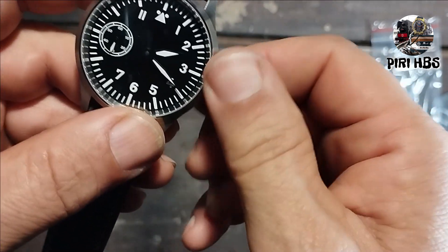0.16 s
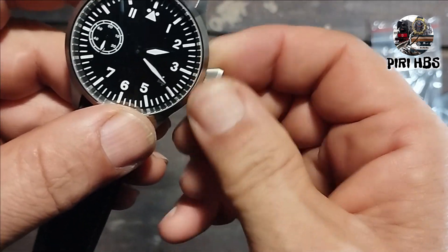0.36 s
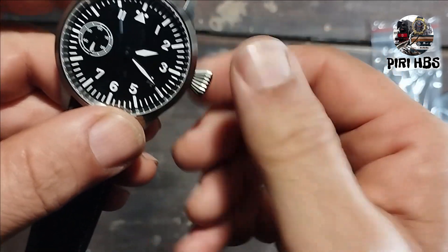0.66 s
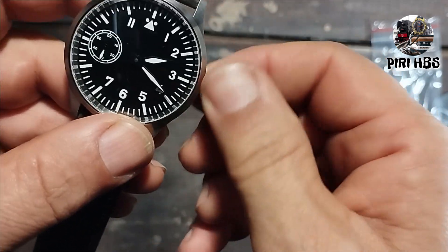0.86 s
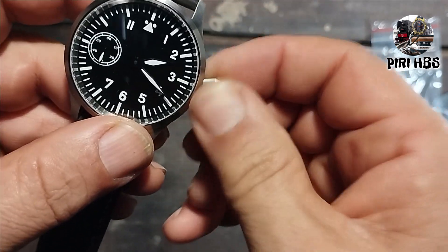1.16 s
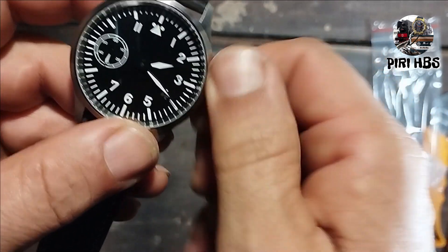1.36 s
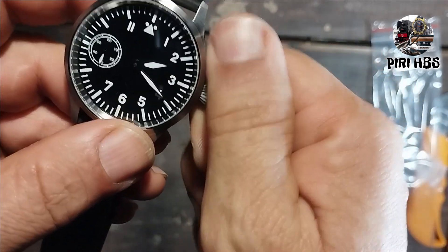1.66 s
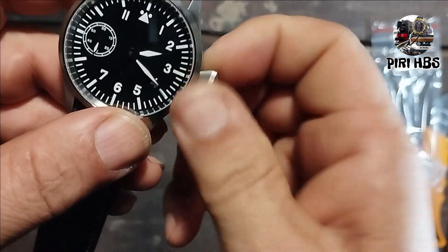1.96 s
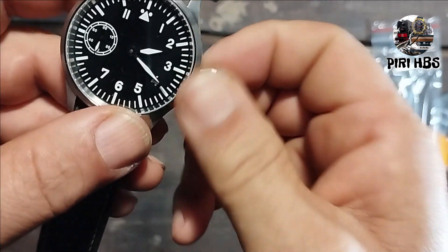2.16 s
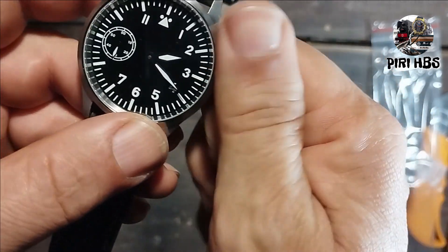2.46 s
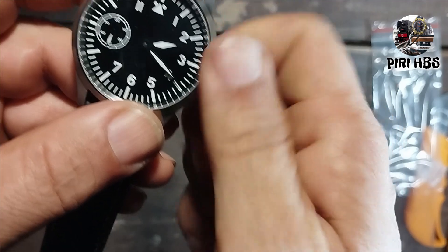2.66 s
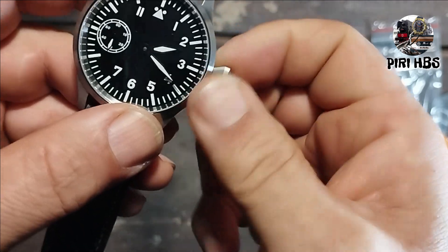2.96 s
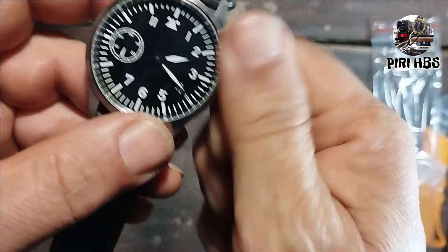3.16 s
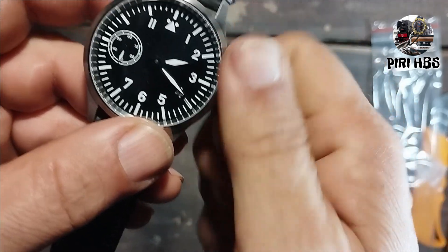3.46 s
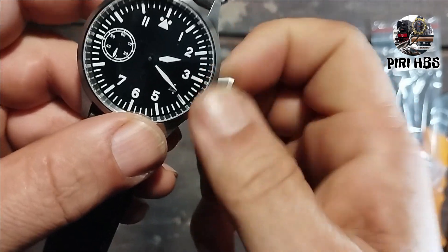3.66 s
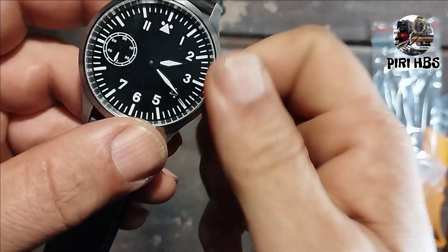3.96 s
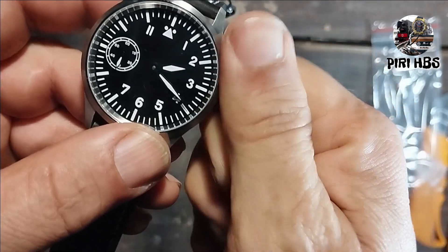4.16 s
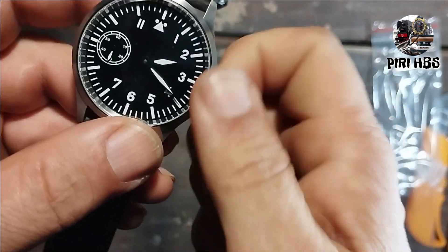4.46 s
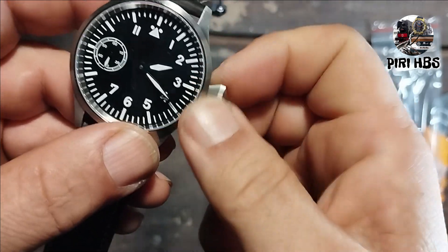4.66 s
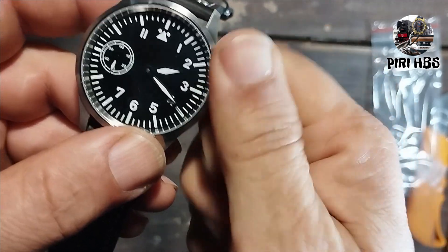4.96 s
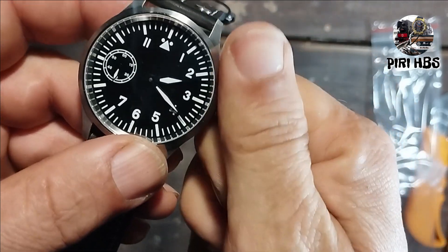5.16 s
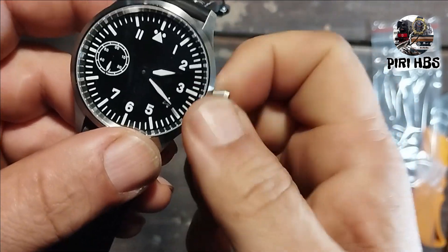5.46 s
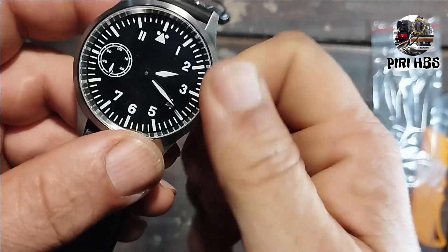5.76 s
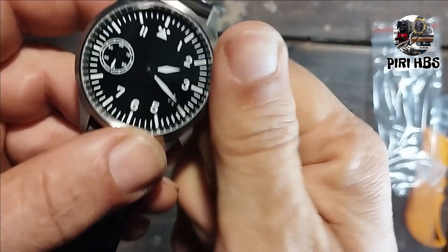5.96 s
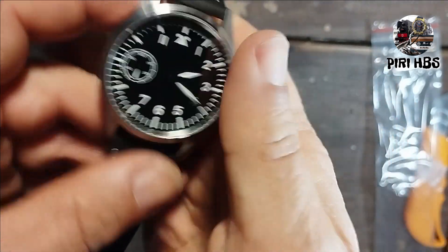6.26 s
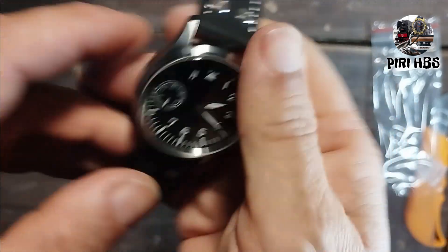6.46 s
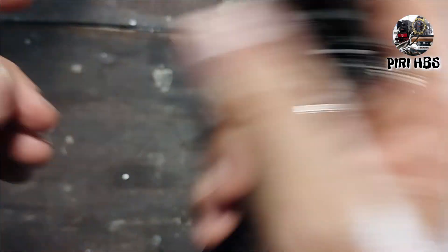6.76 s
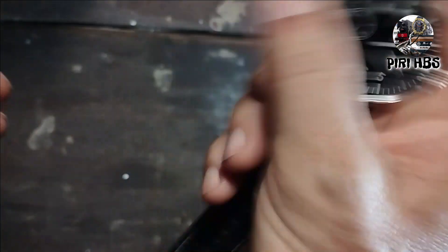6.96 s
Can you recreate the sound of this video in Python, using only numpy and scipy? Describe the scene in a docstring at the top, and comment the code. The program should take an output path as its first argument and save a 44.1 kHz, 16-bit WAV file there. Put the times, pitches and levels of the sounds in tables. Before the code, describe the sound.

Fingers wind a steel wristwatch close to the microphone in a quiet room. A few light ticks come first, then six short strokes of the crown, each a quick run of crisp, slightly ringing ratchet clicks. Softer, drier ticks follow as the crown turns back between strokes. The winding stops near the end, leaving very faint rubbing of skin and strap. A low handling rumble, a distant engine drone and slight hiss lie underneath.

```python
"""A wristwatch is wound by hand, close to a phone. In six forward strokes of the crown (the winding knob),
a small catch snaps over the teeth of a wheel and makes the steel case ring. On each turn back, the
clutch teeth slip over each other with lighter ticks. Fingers rub over the crown, case and strap.
Underneath are the drone of a far engine, a low handling rumble, room noise and hiss."""
import sys
import numpy as np
from scipy import signal
from scipy.fft import rfft, irfft, next_fast_len
from scipy.io import wavfile
from scipy.ndimage import uniform_filter1d

SR = 44100
rng = np.random.default_rng(int(sys.argv[2]) if len(sys.argv) > 2 else 0)


def store_pcm(level_fs):
    """Save levels as 16-bit WAV."""
    pcm = np.round(np.clip(level_fs, -1, 1) * 32767).astype(np.int16)
    wavfile.write(sys.argv[1], SR, np.atleast_2d(pcm).T)


N = 314025
TIME = np.arange(N) / SR

# Forward strokes of the crown; the grip lets different parts ring each time. Each row: start in seconds,
# length in seconds, then how strongly the case, back plate and wheel ring, in dB.
CROWN_STROKES = [(1.30, 0.39, -16.5, -20, -8.5), (2.28, .29, -15.5, -21, -7),
                 (3.099, 0.31, -15.5, -18.5, -8.5), (3.98, .35, -16.5, -14, -12),
                 (4.886, .34, -16.5, -14, -10.5), (5.768, .34, -16.5, -14, -13)]
# Clutch teeth slipping. Each row: time in seconds, level in dB, treble in dB relative to that level.
CLUTCH_SLIPS = [(0.243, -49, -17), (0.2932, -53.5, -9), (0.3382, -51, -11), (0.3781, -47, -19),
                (0.4396, -49.5, -11), (0.4767, -49, -13), (0.5253, -47.5, -19), (0.9201, -51.5, -19),
                (0.9682, -53.5, -14), (0.995, -49.5, -19), (1.018, -49.5, -14), (1.064, -48, -12.5),
                (1.2535, -46, -18), (1.8495, -48, -23), (1.8735, -52, -16), (1.8988, -42.5, -24),
                (1.925, -52, -15), (1.9495, -52.5, -12), (1.9804, -49.5, -14), (2.0211, -49.5, -14),
                (2.048, -48, -16), (2.0692, -47.5, -17), (2.0993, -49.5, -14), (2.2296, -50, -26),
                (2.6724, -47, -23), (2.6933, -53, -15), (2.7196, -49, -19), (2.7422, -51, -18),
                (2.7591, -53, -13), (2.7731, -49, -13), (2.7915, -52, -14), (2.8583, -50, -17),
                (2.888, -51, -16), (2.918, -53, -14), (3.5227, -50.5, -21), (3.5324, -51.5, -18),
                (3.5556, -51, -13), (3.5766, -52, -15), (3.5972, -52, -17), (3.6204, -53, -13),
                (3.6411, -53, -17), (3.6606, -52, -15), (3.6865, -51.5, -15), (3.7283, -50, -17),
                (3.7605, -48.5, -17), (3.7834, -53, -18), (3.921, -55, -17), (4.4046, -51, -20),
                (4.426, -56, -15), (4.4458, -54, -15), (4.4667, -50, -17), (4.4874, -52, -14),
                (4.5089, -48.5, -19), (4.5344, -51.5, -14), (4.566, -52, -14), (4.597, -49.5, -16),
                (4.6239, -49, -16), (4.6536, -52, -16), (4.812, -52.5, -21), (5.3353, -54, -21),
                (5.3466, -50.5, -19), (5.3663, -57, -14), (5.3827, -50, -17), (5.3996, -51, -16),
                (5.4151, -48.5, -20), (5.4331, -55, -18), (5.458, -51, -18), (5.5059, -53, -14),
                (5.539, -50.5, -14), (5.5932, -49.5, -16), (5.7129, -52.5, -23)]


def winding():
    """A spring-loaded catch drops off each tooth of the wheel, making a crack and ringing the watch."""
    # Each row is one tooth: time in seconds, level in dB, treble in dB relative to that level.
    teeth = [(1.311, -40.5, -17), (1.342, -37.5, -19), (1.383, -42, -19), (1.4185, -40, -21),
             (1.4435, -39.5, -18), (1.4687, -40.5, -17), (1.501, -40, -19), (1.5513, -37.5, -18),
             (1.5855, -37, -15), (1.6318, -41.5, -14), (2.2758, -38, -19), (2.2942, -40, -15),
             (2.3221, -40.5, -9), (2.349, -38.5, -12), (2.369, -39.5, -18), (2.387, -39, -19),
             (2.4043, -40, -21), (2.4256, -37.5, -14), (2.4524, -40.5, -21), (2.4833, -41, -18),
             (2.5121, -40.5, -17), (2.5471, -42, -16), (3.1137, -39, -17), (3.1272, -41, -17),
             (3.1428, -39, -20), (3.1593, -40, -11), (3.173, -40, -21), (3.1906, -39.5, -21),
             (3.219, -41.5, -15), (3.2503, -40, -22), (3.269, -38.5, -18), (3.2844, -38, -18),
             (3.3027, -39, -18), (3.3428, -39.5, -11), (3.3962, -37.5, -18), (3.9906, -40.5, -14.5),
             (4.0082, -41, -13), (4.0248, -40, -18), (4.0451, -39, -20), (4.0698, -40, -20),
             (4.0914, -38.5, -20), (4.1135, -39, -18), (4.1389, -37, -20), (4.1614, -38, -19),
             (4.1839, -37.5, -24), (4.209, -38.5, -19), (4.2475, -38.5, -17), (4.3223, -39.5, -9),
             (4.8979, -41.5, -11.5), (4.9182, -43.5, -12), (4.9356, -39, -18), (4.9515, -43, -16),
             (4.9703, -40.5, -19), (4.9928, -39, -22), (5.0207, -38, -23), (5.0433, -39, -22),
             (5.0649, -39, -21), (5.0863, -39, -18), (5.123, -38, -17), (5.1612, -40.5, -17),
             (5.2182, -41, -9.5), (5.7784, -38, -18), (5.7928, -40, -13), (5.8117, -40.5, -13),
             (5.8406, -40.5, -19), (5.879, -39.5, -18), (5.9075, -39.5, -18), (5.9281, -39.5, -14),
             (5.944, -37.5, -14), (5.9684, -37, -16), (6.0049, -39.5, -12), (6.1006, -42, -20)]
    # The tone of steel hitting steel. Each row: frequency in Hz, left level in dB, right level in dB.
    spectrum = [(500, -32.5, -29), (1400, -14, -18.5), (1970, -3.5, -6), (2600, 2, 1), (3300, -2, -0.5),
                (4160, -10, -8.5), (5250, -4.5, -4), (6160, 2.5, -5), (7600, -2, 2.5), (7800, 0, -1.5),
                (8840, 0, -4.5), (11200, -13, -23), (11540, -1, -8), (13000, -10.5, -9.5), (14800, 7, -3.5),
                (16800, -19, -16)]
    times, db, treble_db = np.transpose(teeth)
    strokes = np.array(CROWN_STROKES)
    middles = strokes[:, 0] + strokes[:, 1] / 2
    nearest = np.argmin(np.abs(times[:, None] - middles), axis=1)
    start, length, case_db, plate_db, wheel_db = strokes[nearest].T
    progress = np.clip((times - start) / length, 0, 1)
    # As the hand closes round the case, its ring gets brighter and the wheel is muffled.
    closed = np.clip((times - start) / 0.11, 0, 1)
    tilt_db = -19 + 33 * closed
    wheel_db = wheel_db - 9 * progress ** 2
    # A tooth that drops after a pause rings the back plate harder, fully so after 0.082 seconds.
    settled = np.minimum(np.diff(times, prepend=0) / 0.082, 1)
    plate_db = plate_db + 8.5 * (settled - .5)
    parts_db = [case_db, plate_db, wheel_db, treble_db - 0.5]
    rise = .05 * (progress - .35)  # the pitch of the case climbs 5% over a stroke
    snaps = tooth_crack(times, db - 3.5, treble_db + 16, spectrum,
                        strike=1.6, bounce_db=-4, bounce_s=0.0033)
    return snaps + watch_ring(times, db, parts_db, tilt_db, detune=0.007, scatter=0.18, case_rise=rise)


def slipping():
    """Turned back, the sloped clutch teeth ride over each other; the fingers cut the ringing short."""
    # The tone of one tick. Each row: frequency in Hz, left level in dB, right level in dB.
    spectrum = [(514, -27, -39), (2190, -12.5, -2.5), (3500, 1, -1), (4700, -5.5, -3.5), (6180, 1.5, 2.5),
                (7170, 2, -3), (7950, -5.5, 3.5), (9560, -3, -4.5), (11040, -16.5, -22), (11900, -12.5, -9),
                (12900, -4.5, -14), (15500, -4.5, -10), (16500, -15.5, -16)]
    times, db, treble_db = np.transpose(CLUTCH_SLIPS)
    ticks = tooth_crack(times, db - 1, treble_db + 18, spectrum, strike=2.2, bounce_db=0, bounce_s=0.0016)
    parts_db = [-30.5, -17, -17, treble_db - 1]  # case, back plate, wheel, treble
    return ticks + watch_ring(times, db, parts_db, tilt_db=19, detune=.01, scatter=0.43, longest_s=.06)


def tooth_crack(times, db, treble_db, spectrum, strike, bounce_db, bounce_s):
    """A tooth lands with a hard, gritty hit; the spring throws it back and it lands again, thinly."""
    size, split_hz, right_lag_s = 1024, 11000, 7 / SR
    grit = rng.standard_normal((len(times), 3, size))  # left, right and shared noise
    decay = fade(0.014, size)
    lowpass = signal.butter(4, split_hz, fs=SR, output="sos")
    highpass = signal.butter(4, split_hz, "high", fs=SR, output="sos")
    hz, *sides_db = np.transpose(spectrum)
    bounce_delay = bounce_s * rng.uniform(0.94, 1.0, len(times))
    out = []
    for side, side_db in enumerate(sides_db):
        burst = (grit[:, 2] + .5 * grit[:, side]) * decay
        burst[:, 8] += strike  # one sharp spike is the hit itself
        burst /= np.linalg.norm(burst, axis=1, keepdims=True) / np.linalg.norm(decay)
        arrival = times + side * right_lag_s
        dull = place(arrival, burst, db)
        bright = place(arrival, burst, db + treble_db)
        bright += place(arrival + bounce_delay, burst, db + treble_db + bounce_db)
        crack = signal.sosfilt(lowpass, dull) + signal.sosfilt(highpass, bright)
        out.append(colour(crack, hz, side_db))
    return np.array(out)


def watch_ring(times, db, parts_db, tilt_db, detune, scatter, case_rise=0, longest_s=.5):
    """Each hit rings the watch like a tiny bell, a little differently as the grip changes."""
    # The watch's own tones. Each row: pitch in Hz, seconds to fade by 60 dB, left level in dB,
    # right level in dB, how far the left wave runs ahead in radians.
    tones = [(2500, 0.015, -1.5, 1, 4), (2800, 0.034, 2.5, 4.5, 3.7), (3060, 0.034, -2, -2, 2.3),
             (3357, 0.033, -3, 1.5, -2.5), (5400, 0.028, -3.5, -7, -1.3), (5700, 0.028, 0, 0.5, -0.3),
             (5735, 0.17, -11, -11, 2.3), (6140, 0.017, 2.5, -8, -6.5), (6650, 0.016, 3.5, -9, -3),
             (8265, 0.01, 4, 4, 0.28), (8660, 0.012, -11, -1, 6.5), (12340, 0.03, 5, -13, -3),
             (12800, 0.014, -3, -6, -2), (14400, 0.0026, -2, -3, 1.5), (15200, 0.011, -4, -19, 5)]
    # The middle pitches in Hz of the case, back plate, wheel and treble rings.
    parts_hz = [3000, 5700, 8400, 12000]
    chance = rng.standard_normal((len(times), len(tones), 3))
    starts = times + .0002  # just after the hit
    out = np.zeros((2, N))
    for k, (hz, fade_s, left_db, right_db, lead) in enumerate(tones):
        part = np.argmin(np.abs(np.log(np.array(parts_hz) / hz)))
        is_case = part == 0
        octaves_up = np.log2(hz / parts_hz[0])
        level_db = db + parts_db[part] + tilt_db * octaves_up * is_case
        fade_s = min(fade_s, longest_s)
        size = int(fade_s * SR)
        pitch = hz * (1 + detune * chance[:, k, :1] + np.reshape(case_rise, (-1, 1)) * is_case)
        strength = 1 + scatter * (chance[:, k, 1:2] + 1j * chance[:, k, 2:])  # also shifts the phase
        tone = strength * np.exp(2j * np.pi * pitch * np.arange(size) / SR) * fade(fade_s, size)
        out[0] += place(starts, (tone * np.exp(1j * lead / 2)).imag, level_db + left_db)
        out[1] += place(starts, (tone * np.exp(-1j * lead / 2)).imag, level_db + right_db)
    # So small a body gives off almost no bass.
    return signal.sosfilt(signal.butter(2, 1900, "high", fs=SR, output="sos"), out)


def room_echo(sound, echo_db, fade_s, cutoff_hz, size=16384):
    """The table and walls send back a faint, dull echo, different on each side."""
    tail = rng.standard_normal((2, size)) * fade(fade_s, size)
    tail *= np.arange(size) > .003 * SR  # the echo takes 3 ms to arrive
    lowpass = signal.butter(1, cutoff_hz, fs=SR, output="sos")
    tail = signal.sosfilt(lowpass, tail / np.linalg.norm(tail[0]))
    return sound + undb(echo_db) * signal.oaconvolve(sound, tail, axes=1)[:, :N]


def fingers(grain, stroke_db, regrip_db, regrip_s):
    """Skin rubs the ridged crown late in a stroke and as it turns back, then the case and strap."""
    # The hand brushes the case as it turns the watch away, and the leather strap scuffs.
    # Each row: time of the peak in seconds, width in seconds, level in dB.
    case_brushes = [(6.03, .08, -73), (6.421, 0.11, -73.5), (6.6, .04, -77), (6.757, 0.088, -74)]
    strap_scuffs = [(6.578, 0.014, -73.5), (6.72, 0.028, -81), (6.79, 0.021, -73), (6.9, 0.03, -75.5)]
    # The tone of skin and of the duller leather. Each row: frequency in Hz, level in dB.
    skin_spectrum = [(800, -22), (2500, -10), (4500, -2), (5800, -3.5), (8000, -15), (10500, -7.5),
                     (12300, -6.5), (15500, 4.5), (16500, -27)]
    leather_spectrum = [(800, -22), (2500, -6), (4500, 0), (5800, -4), (8000, -16), (10500, -8),
                        (16500, -14)]
    slip_times = np.transpose(CLUTCH_SLIPS)[0]
    rubs = [(start + .75 * length, 0.33 * length, stroke_db) for start, length, *_ in CROWN_STROKES]
    regrips = [(slip_times[slip_times > start][0] - regrip_s / 2, regrip_s, regrip_db)
               for start, *_ in CROWN_STROKES[:-1]]
    roughness = np.exp(grain * unit(uniform_filter1d(rng.standard_normal(N), size=120)))
    skin = unit(roughness * noise(skin_spectrum, width_db=1.5, left_db=3.5))
    leather = unit(roughness * noise(leather_spectrum, width_db=-0.5, left_db=1))
    return swells(rubs + regrips + case_brushes) * skin + swells(strap_scuffs) * leather


def mount_sway(sway_hz):
    """The phone's mount swings with a low hum when the hands bump the table."""
    # Each row: time of the peak in seconds, width in seconds, level in dB.
    bumps = [(.15, 0.42, -47.5), (7.03, 0.069, -42.5)]
    return swells(bumps) * np.sqrt(2) * np.sin(2 * np.pi * (sway_hz * TIME + rng.random()))


def far_engine(level_db, waver, throb_db):
    """A far engine comes through the walls as a wavering low note with two overtones."""
    # Each row: time in seconds, firings per second.
    speeds = [(0, 69.87), (.55, 69.76), (.75, 71.97), (1.95, 72.44), (2.3, 74.27), (3, 72.76), (3.6, 74.37),
              (5.5, 71.93), (6.6, 67.3), (7.12, 66.8)]
    # Each row: time in seconds, level of the low note in dB, level of the overtones in dB.
    levels = [(0.0, -49.5, -57), (0.1, -46, -60), (0.67, -64.5, -52), (0.79, -50.5, -60.5),
              (2.2, -46, -58.5), (2.74, -46.5, -72.5), (2.79, -44.5, -63.5), (3.33, -53, -78),
              (3.49, -56, -66), (4.34, -48.5, -72.5), (5.1, -62.5, -72.5), (5.67, -51, -66),
              (6.07, -57, -71), (6.17, -43, -61), (6.35, -50.5, -73), (7.08, -53.5, -65.5),
              (7.12, -58, -74.5)]
    hz, = curves(speeds)
    base_db, overtone_db = curves(levels)
    second_db = overtone_db + .8
    third_db = overtone_db - 8 + .4 * (overtone_db - overtone_db.mean())  # swells more than the second
    drift = uniform_filter1d(rng.standard_normal(N), size=3000)
    drift = unit(uniform_filter1d(drift, size=3000))
    phase = 2 * np.pi * np.cumsum(hz * (1 + waver * drift)) / SR
    side_phase, side_db = np.array([[0], [0.42]]), np.array([[-.9], [.9]])
    drone = np.zeros((2, N))
    for k, db in enumerate([base_db, second_db, third_db], 1):
        loudness = undb(db + throb_db * wander(span_s=.12))
        drone += loudness * np.sqrt(2) * np.sin(k * phase + side_phase)
    return drone * undb(level_db + side_db)


def background(middle_db, hiss_db, unsteady_db):
    """Handling rumble, gently wavering room noise and a steady hiss lie under everything."""
    # Each row: time in seconds, rumble level in dB, room noise level in dB.
    levels = [(0, -48.5, -63), (.8, -48.5, -62), (1.5, -46, -60.5), (2.8, -46, -60.5), (4.2, -48, -63),
              (5.1, -48.5, -60), (5.7, -51, -60), (6.4, -48, -63.5), (7.12, -52, -64)]
    # The tone of each noise. Each row: frequency in Hz, level in dB.
    rumble_spectrum = [(15, -23.5), (25, -15), (34, 0.5), (44, -1), (56, 1.5), (68, -8.5), (82, -14),
                       (100, -7.5), (120, -25), (200, -29), (500, -70.5)]
    low_room_spectrum = [(25, -25.5), (50, -6.5), (110, 0.5), (170, 0), (260, 1), (330, -2.5), (380, -11),
                         (520, -13.5), (800, -24.5), (2000, -57)]
    middle_room_spectrum = [(200, -14.5), (500, 2), (750, 3), (1100, -2), (1700, -4), (2600, -8.5),
                            (5000, -25.5), (12000, -34)]
    hiss_spectrum = [(500, -6), (2500, -1), (4500, 2), (7000, -3), (10500, -10.5), (12300, -3), (15500, 1),
                     (16500, -20)]
    rumble_db, room_db = curves(levels)
    rumble = noise(rumble_spectrum, width_db=-14.5) * undb(rumble_db)
    low = noise(low_room_spectrum, width_db=-6.5, left_db=1)
    low *= undb(room_db + unsteady_db * wander(span_s=.11))
    middle = noise(middle_room_spectrum, width_db=2, left_db=0.8)
    middle *= undb(middle_db + 0.72 * (room_db - room_db.mean()))
    hiss = noise(hiss_spectrum, width_db=0, left_db=-0.7) * undb(hiss_db)
    return rumble + low + middle + hiss


def undb(db):
    """Turn decibels into a number to multiply by."""
    return 10 ** (np.asarray(db) / 20)


def unit(x):
    """Scale a signal to an average strength (rms) of 1."""
    return x / np.sqrt(np.mean(x ** 2))


def curves(table):
    """Join a table's timed points with straight lines, one curve for each column of values."""
    times, *columns = np.transpose(table)
    return [np.interp(TIME, times, column) for column in columns]


def gains(hz, db, size):
    """Fill in a gain for every frequency from a few given points."""
    return undb(np.interp(np.log(np.fft.rfftfreq(size, 1 / SR) + 1), np.log(hz), db))


def colour(x, hz, db, size=512):
    """Shape a sound's tone with a filter that never rings ahead of a hit, so hits stay sharp."""
    cepstrum = irfft(np.log(gains(hz, db, size)))[:size // 2]
    cepstrum[1:] *= 2
    response = irfft(np.exp(rfft(cepstrum, size)))
    return signal.oaconvolve(x, response)[:N]


def noise(spectrum, width_db, left_db=0):
    """Stereo noise with the given tone, width and lean to the left."""
    size = next_fast_len(N, True)
    white = rfft(rng.standard_normal((2, size)))
    shared, spread = irfft(white * gains(*np.transpose(spectrum), size), size)[:, :N]
    sides = np.array([[1], [-1]])
    return unit((shared + undb(width_db) * spread * sides) * undb(left_db * sides / 2))


def fade(fade_s, size):
    """A smooth decay that loses 60 dB in fade_s seconds."""
    return np.exp(-np.log(1000) * np.arange(size) / SR / fade_s)


def place(times, shapes, db):
    """Put one short sound at each time, each at its own level."""
    out = np.zeros(N)
    samples = (times * SR).astype(int)[:, None] + np.arange(shapes.shape[1])
    np.add.at(out, samples, shapes * undb(db)[:, None])
    return out


def swells(table):
    """Add up one smooth rise and fall in level for each row."""
    return sum(undb(db) * np.exp(-np.minimum(((TIME - peak) / width) ** 2, 50))
               for peak, width, db in table)


def wander(span_s):
    """A slow random curve that takes a new turn every span_s seconds."""
    knots = np.arange(0, TIME[-1] + span_s, span_s)
    return unit(np.interp(TIME, knots, rng.standard_normal(len(knots))))


def scene():
    """Mix the watch and its echo with the hands, the engine and the background."""
    watch = room_echo(winding() + slipping(), echo_db=-14, fade_s=0.16, cutoff_hz=7040)
    hands = fingers(grain=0.37, stroke_db=-76, regrip_db=-68.5, regrip_s=0.024)
    sway = mount_sway(sway_hz=33.3)
    engine = far_engine(level_db=-0.86, waver=0.011, throb_db=1.2)
    return watch + hands + sway + engine + background(middle_db=-71, hiss_db=-78.5, unsteady_db=1.36)


def record(dry):
    """The phone cuts off the highest treble, above 16400 Hz."""
    return signal.sosfilt(signal.ellip(8, .2, 70, 16400, fs=SR, output="sos"), dry)


dry = scene()
out = record(dry)
store_pcm(out)
```